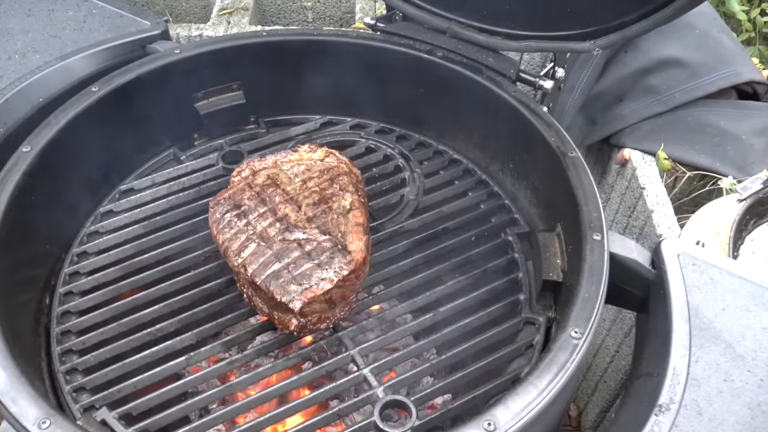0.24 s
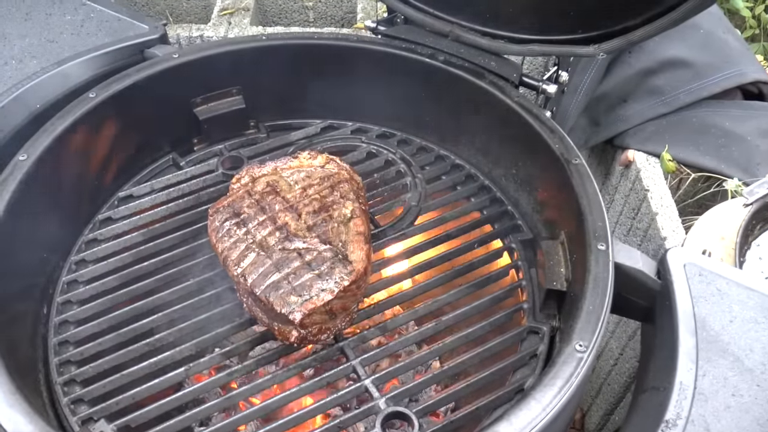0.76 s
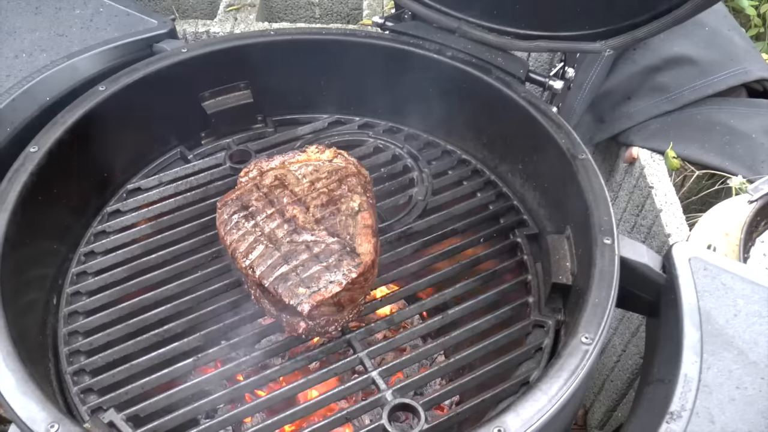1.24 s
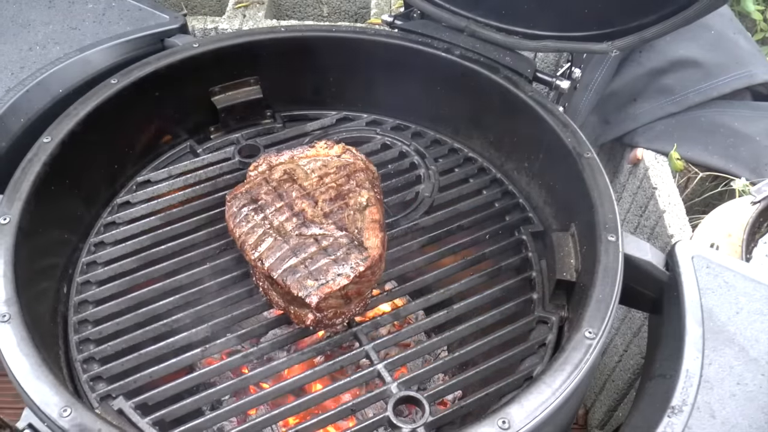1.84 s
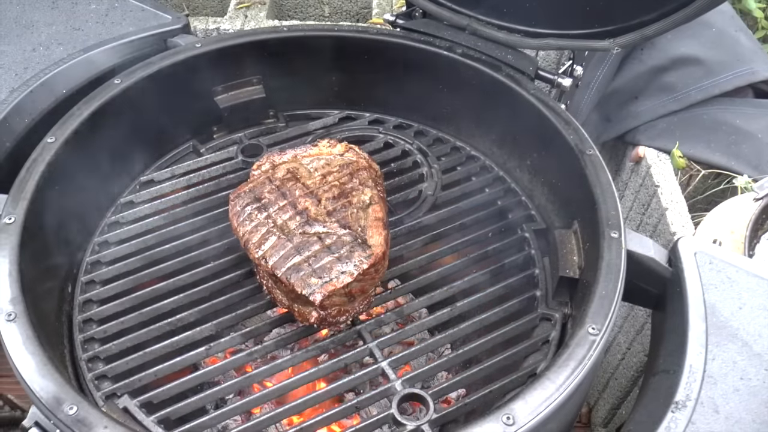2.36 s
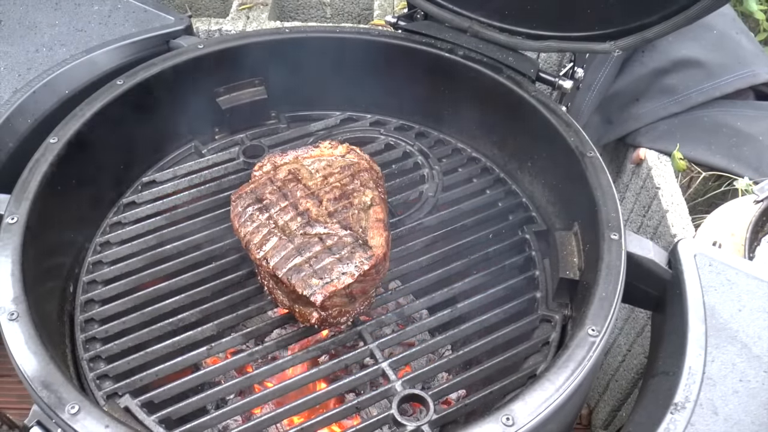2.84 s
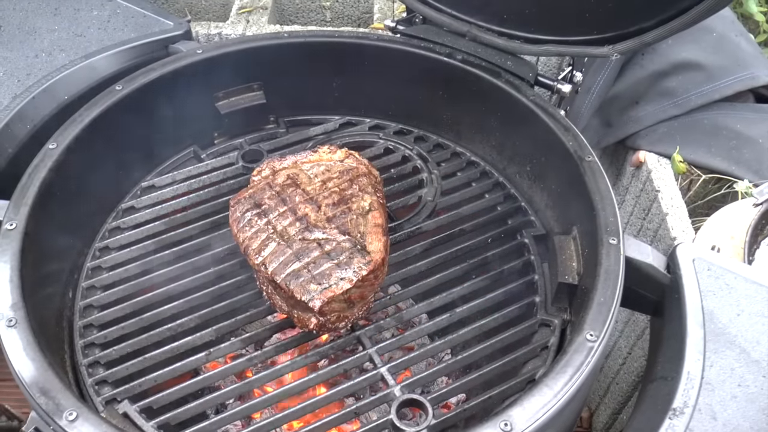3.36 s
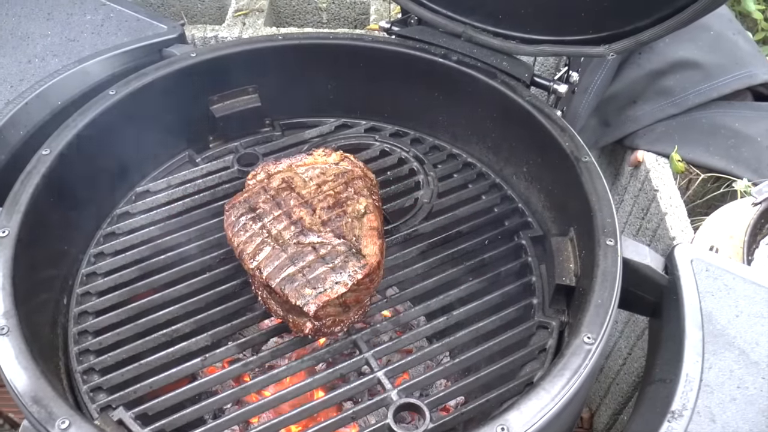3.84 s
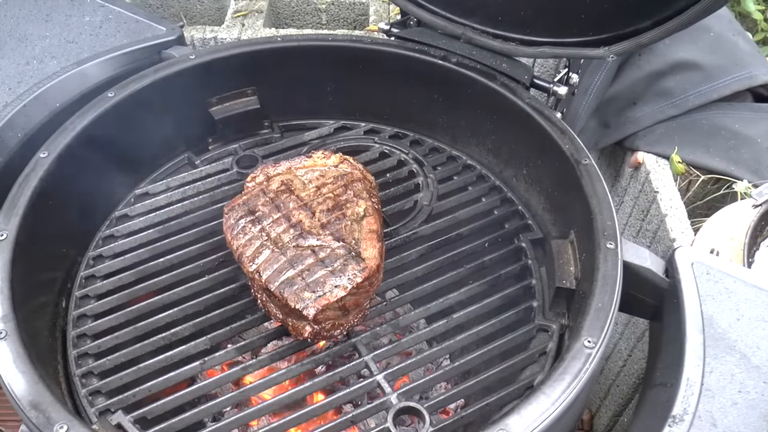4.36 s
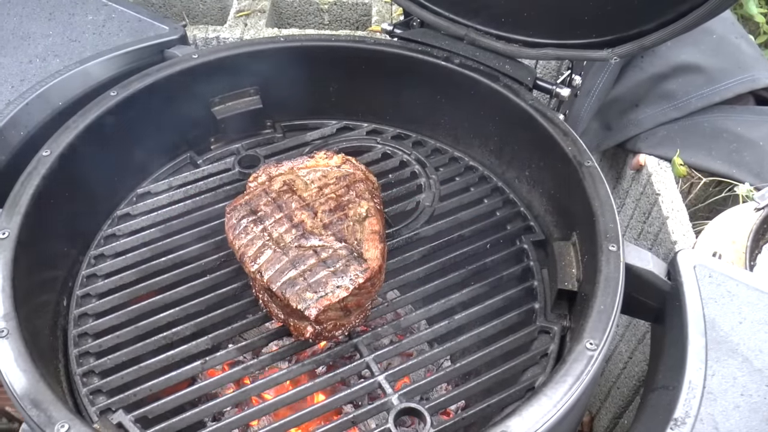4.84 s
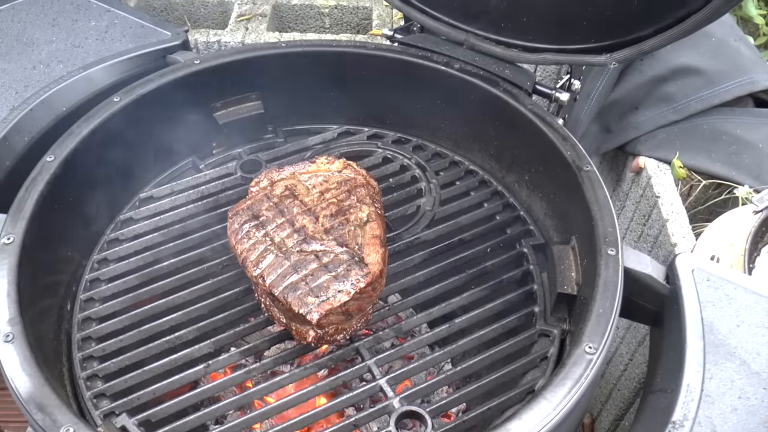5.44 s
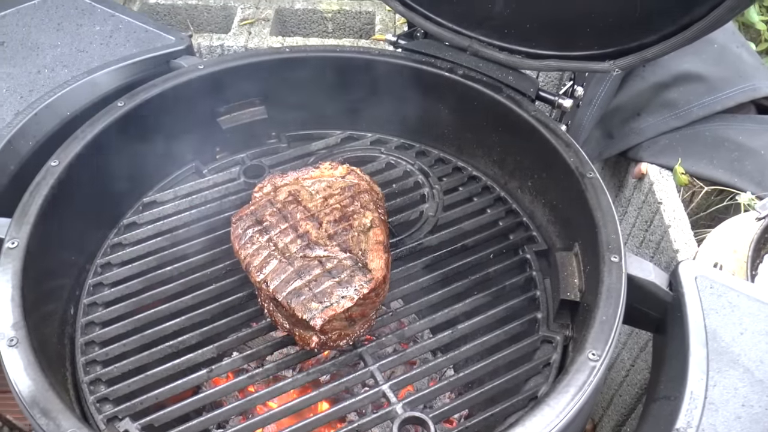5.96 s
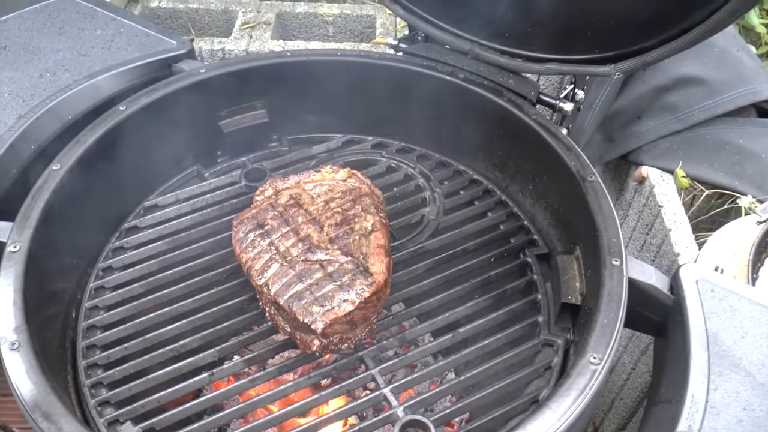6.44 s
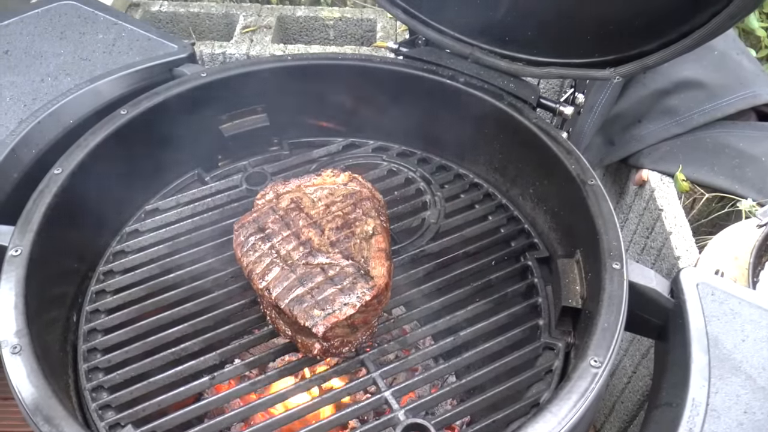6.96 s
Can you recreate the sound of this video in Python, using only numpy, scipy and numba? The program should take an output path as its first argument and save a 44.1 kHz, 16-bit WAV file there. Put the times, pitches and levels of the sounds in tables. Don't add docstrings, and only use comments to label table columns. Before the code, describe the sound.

A roast sizzles on the iron grate of a round charcoal grill outdoors, captured close in mono. The bright, grainy hiss runs throughout the roughly 7 seconds, gently surging and thinning, with drifting hollow metallic resonances from the bowl. Beneath it are quiet fire flutter and faint breeze rumble. Small pops and dull knocks come in the first half second; at about 0.75 s a loud, sharp cluster of fat cracks bursts with a soft low flare, followed by lesser pops near 1.0 and 1.3 s. Around 1.55 s another low puff of flame sounds, then from 1.7 to 2.5 s a wind gust buffets the microphone with heavy, uneven, slightly saturated low thuds. It clears and the sizzle continues, with snaps near 3.8 and 4.35 s, bright spits around 4.9, 5.2, 5.4 and 6.0 s, a crack at 6.9 s and a last spit near 7.1 s.

```python
import sys
import numpy as np
from scipy import signal
from scipy.fft import rfft, irfft, next_fast_len
from scipy.io import wavfile
from scipy.ndimage import uniform_filter1d
from numba import njit

SR = 44100
rng = np.random.default_rng(int(sys.argv[2]) if len(sys.argv) > 2 else 0)


def persist_wave(psi):
    counts = np.round(np.clip(psi, -1, 1) * 32767).astype(np.int16)
    wavfile.write(sys.argv[1], SR, np.atleast_2d(counts).T)


def ratio_of_db(decibels):
    return 10 ** (np.asarray(decibels, float) / 20)


N = 317079


def rms_one(x):
    return x / np.sqrt(np.mean(x ** 2) + 1e-20)


def in_time(rows):
    s, *columns = np.transpose(rows)
    return [np.interp(np.arange(N) / SR, s, c) for c in columns]


def swell(s, half_s):
    return np.exp(-((np.arange(N) / SR - s) / half_s) ** 2)


def band(x, low_hz, high_hz):
    return signal.sosfilt(signal.butter(2, [low_hz, min(high_hz, .45 * SR)], "band", fs=SR, output="sos"), x)


def drift(rate):
    r = np.exp(-100 * np.pi * rate / SR)
    noise = rng.standard_normal(N // 50 + 2002)
    slow = signal.lfilter([1], [1, -2 * r, r * r], noise)[2000:]
    slow = slow - uniform_filter1d(slow, int(SR / 50 / rate * 1.5))
    return np.interp(np.arange(N) / 50, np.arange(len(slow)), rms_one(slow))


def lumps(spectrum, hold):
    hz, db = np.transpose(spectrum)
    size = next_fast_len(N)
    bins = np.arange(1, size // 2 + 2) * SR / size
    colour = ratio_of_db(np.interp(np.log(bins), np.log(hz), db, left=-90, right=-90))
    noise = rms_one(irfft(rfft(rng.standard_normal(size)) * colour, size)[:N])
    return rms_one(noise / (uniform_filter1d(noise ** 2, size=2600) + 0.058) ** hold)


def port_flutter():
    # frequency in Hz, level in dB per Hz.
    flutter_spectrum = [(35, -33), (50, -5.5), (70, 7.5), (110, -3), (170, -11.5), (250, -25.5), (350, -36),
                        (600, -41)]
    return lumps(flutter_spectrum, hold=0.63)


def breeze(flutter):
    # time in seconds, rumble level in dB.
    strength = [(0, -36.5), (.2, -46), (.42, -36.5), (.95, -38.5), (1.24, -31.5), (1.5, -41), (1.7, -35),
                (2.62, -34.5), (2.8, -32), (3.08, -34.5), (3.5, -39), (3.83, -30.5), (4.1, -39),
                (4.85, -35.5), (5.1, -39), (5.68, -36.5), (6.28, -38), (7.19, -38.5)]
    # frequency in Hz, level in dB per Hz.
    rumble_spectrum = [(5.9, -23), (10, 9), (24, -4), (38, -6.5), (74, -14.5), (110, -22.5), (140, -38),
                       (240, -120)]
    # centre in seconds, flutter level in dB, half length in seconds.
    light_puffs = [
        (0.245, -46, .05),
        (2.854, -47.5, 0.05),
        (3.06, -44, 0.049),
        (3.796, -55, 0.1),
        (4.02, -43, 0.053),
        (5.318, -45.5, 0.049),
        (6.24, -39, 0.072),
    ]
    level_db, = in_time(strength)
    rumble = ratio_of_db(level_db + 1.5 * drift(4.1)) * lumps(rumble_spectrum, hold=0.29)
    return rumble + flutter * sum(ratio_of_db(db) * swell(s, half) for s, db, half in light_puffs)


def whip(speed_db):
    # frequency in Hz, level in dB per Hz.
    whip_spectrum = [(90, -14), (150, 14), (230, 3), (350, -9), (700, -26)]
    level_db = -39.5 + 1.9 * (speed_db + 25)
    return ratio_of_db(level_db + 3.0 * drift(18.0)) * lumps(whip_spectrum, hold=0.05)


def gust(flutter):
    # time in seconds, speed of the gust heard as flutter in dB.
    speed = [
        (1.6, -45),
        (1.71, -31.5),
        (1.75, -32),
        (1.93, -31.5),
        (2.2, -26.5),
        (2.36, -30),
        (2.46, -36.5),
        (2.6, -57),
    ]
    # frequency in Hz, level in dB per Hz.
    buffet_spectrum = [(8, -20), (14, 5), (28, -2), (45, -2.5), (70, -4), (100, -38), (200, -55)]
    # centre in seconds, peak in dB, half length in seconds, swing in Hz.
    strong_eddies = [(1.724, -26, 0.015, 30), (1.758, -12.5, 0.017, 33), (1.788, -10, 0.026, 29.1),
                     (1.862, -5.5, 0.012, 47.7), (1.895, -13, 0.024, 33), (1.933, -25, 0.017, 35),
                     (1.985, -12.5, 0.031, 34), (2.046, -12.5, 0.011, 50), (2.084, -19, 0.017, 45),
                     (2.143, -18, 0.029, 40.6), (2.196, -24, 0.014, 45), (2.239, -23, .01, 50),
                     (2.253, -21, 0.008, 55), (2.295, -16, 0.011, 50), (2.323, -20, .01, 50),
                     (2.354, -12.5, 0.017, 28.4), (2.396, -25, 0.047, 25.9)]
    speed_db, = in_time([(1.55, -90), *speed, (2.65, -90)])
    t = np.arange(N) / SR
    eddies = sum(ratio_of_db(db) * swell(s, half) * np.cos(2 * np.pi * hz * (t - s)) for s, db, half, hz in strong_eddies)
    turbulence = ratio_of_db(0.5) * lumps(buffet_spectrum, hold=0.53) + flutter
    limit = .7
    pressed = limit * np.tanh((eddies + ratio_of_db(speed_db) * turbulence) / limit)
    return pressed + whip(speed_db)


def fire():
    # time in seconds, level in dB.
    flames = [
        (0, -47.5),
        (.5, -48.5),
        (.8, -41.5),
        (1.3, -47),
        (1.6, -46),
        (2.4, -48),
        (2.8, -50),
        (4.4, -48),
        (7.19, -50.5),
    ]
    # frequency in Hz, level in dB per Hz.
    roar_spectrum = [(45, -21), (70, -5.5), (110, -7), (165, -0.5), (230, -8), (330, -23.5), (600, -24),
                     (1800, -28.5)]
    level_db, = in_time(flames)
    return ratio_of_db(level_db + 1.8 * drift(15.3)) * lumps(roar_spectrum, hold=0.13)


def flares():
    # start in seconds, peak in dB, frequency in Hz.
    ignitions = [(0.076, -31, 147), (0.263, -30.5, 145), (0.71, -24.5, 160), (0.734, -23.5, 132),
                 (0.753, -21, 178), (1.268, -40, 216), (1.541, -20.5, 172), (1.604, -20.5, 164),
                 (2.599, -35, 184), (2.736, -33.5, 121), (2.992, -41, 161), (3.309, -26, 153),
                 (3.975, -29, 157), (4.486, -27.5, 188), (5.852, -50, 165)]
    out, t = np.zeros(N), np.arange(3000) / SR
    for s, db, hz in ignitions:
        swing = -np.sin(2 * np.pi * hz * (t - .004)) * (t / 0.0051) ** 2 * np.exp(-t / 0.0026)
        swing += 0.083 * np.sin(5.2 * np.pi * hz * t) * (t / 0.011) * np.exp(-t / 0.0035)
        at = round(s * SR)
        out[at:at + 3000] += ratio_of_db(db + 16.5) * swing
    return out


def bubbles_and_knocks():
    # start in seconds, peak in dB, frequency in Hz, rise in octaves, length in seconds.
    pockets = [(0.743, -16, 1800, .2, .001), (0.7444, -15, 2380, 0.74, .0021),
               (.7466, -15, 3380, .05, 0.0025), (.7458, -19, 4500, .1, 0.0011),
               (0.747, -24, 6560, .1, .002), (0.9607, -25, 2200, .7, .003),
               (.9795, -34, 2400, 0.44, 0.0027), (1.3195, -29, 3200, .1, 0.0018),
               (3.7761, -19.5, 2500, 0.46, .0014), (4.358, -24, 2300, 0.75, .002),
               (6.9215, -26, 2900, .1, .003), (.6605, -28, 3300, .2, .003)]
    # start in seconds, peak in dB, frequency in Hz.
    drips = [
        (1.272, -37, 450),
        (1.398, -38, 500),
        (1.415, -39, 600),
        (1.545, -36, 446),
        (1.607, -38, 780),
        (1.65, -38, 500),
        (.4125, -36, 900),
        (.311, -37, 1000),
        (.072, -33, 900),
    ]
    knocks = [(s, db, hz, 0, 2.0 / hz) for s, db, hz in drips]
    out = np.zeros(N)
    for s, db, hz, rise, length in [*pockets, *knocks]:
        t = np.arange(int(length * SR))
        pitch = hz * 2 ** (rise * t / len(t))
        envelope = np.sin(np.pi * (t / len(t)) ** 0.65)
        out[round(s * SR) + t] += ratio_of_db(db) * envelope * np.sin(2 * np.pi * np.cumsum(pitch) / SR)
    return out


def cracks():
    # time in seconds, peak in dB.
    snaps = [(.0718, -27), (.3715, -26), (0.7433, -10), (0.7455, -12), (.7506, -20), (.9587, -19),
             (.9601, -23), (.9611, -24), (1.3156, -19), (1.3164, -25), (2.3465, -23), (3.7761, -13),
             (3.8745, -22), (3.8788, -26), (.3822, -20), (.4128, -26), (4.3457, -24), (4.3492, -21),
             (4.3512, -13), (4.3549, -24), (4.359, -17), (6.6345, -18), (6.9066, -12.5), (1.524, -35),
             (4.917, -28), (5.449, -30), (7.002, -26)]
    s, db = np.transpose(snaps)
    clicks = np.zeros(N)
    clicks[np.round(s * SR).astype(int)] = -ratio_of_db(db)
    return ratio_of_db(10.0) * band(clicks, 660, 5400) + ratio_of_db(4.0) * band(clicks, 5200, 12000)


def ticks():
    # time in seconds, peak in dB.
    droplets = [(0.3711, -20), (0.7441, -5), (0.9577, -32), (1.1343, -31), (1.3927, -19), (1.4386, -21),
                (1.5833, -15), (1.7983, -21), (1.8981, -17), (2.14, -20), (2.4818, -21), (2.8549, -27),
                (3.1258, -25), (3.241, -28), (3.4895, -34), (3.6391, -21), (3.7748, -23), (3.7973, -24),
                (3.842, -14), (4.2433, -24), (4.3051, -27), (4.348, -20), (4.7376, -23), (4.9038, -24),
                (4.9317, -22), (5.1961, -25), (5.3607, -23), (5.4186, -20), (5.7493, -21), (5.8257, -22),
                (5.9933, -32), (6.3594, -24), (6.7431, -22), (6.8339, -47), (7.0753, -56), (7.0753, -27)]
    s, db = np.transpose(droplets)
    clicks, at = np.zeros(N + 100), (s * SR).astype(int) + 4
    clicks[at] = ratio_of_db(db) * rng.choice([-1, 1], len(s))
    clicks[at + rng.integers(12, 90, len(s))] += ratio_of_db(db - 11.0)
    return ratio_of_db(7.0) * band(clicks[:N], 9600, 19000)


def crackles(rows, extra_db, snap, fall_db):
    out, t = np.zeros(N + 2000), np.arange(2000) / SR
    draws = rng.standard_normal((len(rows), 2000)) ** 3 / 4
    draws[:, 0] = snap
    for row, db, draw in zip(rows, extra_db, draws):
        at, length = round(row[0] * SR), row[-1]
        burst = draw * ratio_of_db(-fall_db * t / max(length, .001))
        energy = np.sum(burst ** 2) / (1 + 4000 * length)
        out[at:at + 2000] += ratio_of_db(row[1] + db) * burst / np.sqrt(energy)
    return out[:N]


def spits():
    # start in seconds, peak in dB, frequency in Hz.
    droplets = [(.376, -15.5, 8500), (0.7463, -13, 8300), (1.696, -11.5, 6800), (1.7884, -11, 7600),
                (1.902, -13, 7370), (2.14, -12, 7540), (2.162, -17, 8100), (2.481, -18, 8750),
                (2.6584, -27, 7630), (2.86, -35, 7970), (2.9761, -22, 8270), (3.3355, -15, 7600),
                (3.4895, -17, 8700), (3.6391, -16, 10600), (3.841, -18, 6900), (3.92, -18, 7200),
                (4.3525, -15, 8000), (4.7381, -22, 7510), (4.9038, -12.5, 9900), (5.199, -12, 8140),
                (5.3607, -19, 10720), (5.4186, -10.5, 8380), (5.8257, -27, 6500), (6.033, -9.5, 7200),
                (6.363, -11.5, 7840), (6.685, -16, 7850), (7.0747, -8.5, 8040), (7.1367, -11, 6730)]
    out, length_s = np.zeros(N), 0.012
    rows = [(s, db, length_s) for s, db, hz in droplets]
    clicks = crackles(rows, np.zeros(len(rows)), snap=1.3, fall_db=21)
    for s, db, hz in droplets:
        span = slice(round(s * SR), round(s * SR) + 1500)
        out[span] += band(clicks[span], 0.86 * hz, 1.23 * hz)
    return ratio_of_db(-3.0) * out


def pops():
    # start in seconds, peak in dB, brightness in dB, depth in dB.
    single_pops = [(0.07, -25, -15, -3), (.167, -31, 3, -26), (.382, -20, -14, -16),
                   (0.411, -23.5, -9, -8.5), (0.662, -21.5, -18, -15), (4.772, -33, -9, -23),
                   (0.978, -25, -4, -8), (1.14, -26.5, -12, -13), (1.316, -26, -5, -28),
                   (1.399, -38, 21, -1), (1.605, -24.5, -11, -2), (1.637, -31, -4, -4),
                   (2.35, -25, -17, -28), (2.431, -27, 9, -26), (3.017, -30, -13, -28),
                   (3.126, -34, 12, -35), (3.534, -22.5, -11, -16), (3.64, -26, 8, -4.5),
                   (3.777, -27, -4, -7), (3.875, -27, -2, -9), (4.152, -27, -23, -35),
                   (4.338, -26, -6, -28), (4.83, -47, -27, -16), (6.635, -26, 6, -8), (6.746, -25, 11, -13),
                   (6.907, -28, 5, -8)]
    # start in seconds, peak in dB, brightness in dB, depth in dB, length in seconds.
    big_pops = [
        (0.7430, -19.5, -16, 4.5, 0.0029),
        (.7441, -17, 15, -8, 0.001),
        (0.7448, -16, -2, -15, 0.0051),
        (0.7475, -13.5, -4, -16, 0.005),
        (0.956, -26, 2, -7, 0.0082),
        (4.3492, -26, 10, -11, 0.003),
        (4.3514, -22, 3, -18, 0.0044),
        (4.359, -23, -1, -13, 0.0073),
    ]
    rows = np.array([(*pop, 0.0073 + .0001 * (pop[1] + 22)) for pop in single_pops] + [*big_pops])
    clicks = crackles(rows, 0 * rows[:, 2], snap=2.0, fall_db=16.0)
    body = band(clicks, 1220, 5100)
    body = body + ratio_of_db(-15.0) * band(clicks, 2550, 2840) + ratio_of_db(-8.0) * band(clicks, 2950, 3600)
    edge = band(crackles(rows, rows[:, 2], snap=11.0, fall_db=45), 5000, 19000)
    depth = band(crackles(rows, rows[:, 3], snap=0.83, fall_db=4.0), 146, 680)
    return ratio_of_db(5.0) * body, ratio_of_db(-7) * edge + ratio_of_db(13.0) * depth


@njit
def moving_resonance(x, cosine, r):
    y = np.zeros(len(x))
    for i in range(2, len(x)):
        y[i] = (1 - r * r) / 2 * (x[i] - x[i - 2]) + 2 * r * cosine[i] * y[i - 1] - r * r * y[i - 2]
    return y


def bowl(x, fade_db):
    # frequency in Hz, width in Hz, level in dB.
    modes = [(442, 90, -8), (687, 89, -16.5), (1015, 240, -17), (1425, 108, -0.5), (1970, 308, -5),
             (2530, 113, 1.15), (3015, 186, 3), (3547, 108, -2), (3970, 164, -5.5), (4515, 110, -6),
             (3300, 81, -1), (5230, 126, -2.5)]
    # time in seconds, shift by hot air in %, gain into the bowl in dB, lean to upper modes in dB.
    heat = [(0, 1.3, 2, -1), (.3, -1.2, 0.8, 0), (.58, -0.5, 2, 0), (.8, -2, 2, 1.5), (1.2, -1, 2, -1),
            (1.5, 0.5, 0.6, 0), (1.85, 0, 0, 1.5), (2.45, 0, 0, -0.5), (2.8, -2, 0.5, 1.5),
            (3.3, 0.5, 1, 1), (3.9, .9, 0.7, -0.5), (4.4, 1.8, 0, 0), (5.05, 2.5, 0, 0.5),
            (5.45, 1.4, 3.5, -0.5), (5.66, 1, -3, -2.5), (5.95, 0, 1, 0.5), (6.55, -0.5, -1.2, -1),
            (7.19, 1.3, 0.1, 0)]
    # centre in seconds, half length in seconds, mode in Hz, favour in dB, shift in %.
    spots = [(1.1, 0.18, 1426, -5.5, 2), (1.452, 0.29, 1426, 2.5, -3), (2.5, 0.44, 1426, -1.5, -1),
             (.22, .1, 1426, -3.5, -0.5), (4.7, .1, 1426, -3.5, -1), (5.3, 0.084, 1426, 3, -1),
             (.2, 0.36, 2533, -2, 1.5), (1.1, 0.37, 2533, -6, -0.3), (1.9, 0.48, 2533, 0.5, 0.5),
             (2.498, 0.091, 2533, -6, 0), (2.898, 0.13, 2533, 4, -0.8), (0.6, .08, 2533, -4, 0.3),
             (5.88, 0.13, 2533, 4.5, 0), (5.4, .04, 2533, -3, -1), (6.9, .3, 2533, 0.5, 0.5),
             (.18, .13, 3013, 1, 0.5), (0.93, 0.081, 3013, -5.5, -5), (1.13, 0.15, 3013, 3, -0.5),
             (3.098, 0.089, 3013, -0.5, -3), (3.5, 0.2, 3013, 2, 1), (4.2, 0.21, 3013, 3.5, 0),
             (4.8, 0.091, 3013, 4.5, -1), (3.82, .03, 2533, 3, 0), (6.2, 0.78, 3013, -0.5, -2),
             (6.996, 0.21, 3013, 1.5, -0.5), (.2, 0.27, 3546, -5, 2), (0.76, 0.14, 3546, 6.5, 1),
             (1.43, 0.13, 3546, 6, 0), (2.5, 0.23, 3546, 5.5, 1), (3.4, 0.4, 3546, -4.5, 0.5),
             (4.4, 0.2, 3546, 0, 4), (4.8, 0.17, 3546, 7.5, 1), (5.1, .1, 3546, -4, 2),
             (6.0, .3, 3546, 3.5, 0.5), (4.9, 0.27, 3970, -9, -1.5), (7.05, .15, 3970, 6, 1.5),
             (.9, .4, 4518, 0, -0.5), (2.1, .2, 4518, -14, -9), (2.8, 0.33, 4518, 5, 2),
             (6, 0.4, 4518, 6, 3)]
    shift, gain_db, lean_db = in_time(heat)
    stays = np.array([swell(s, half) for s, half, *rest in spots])
    spot_hz, spot_db, spot_shift = np.transpose(spots)[2:]
    out = 0
    for k, (hz, width, db) in enumerate(modes):
        near = np.exp(-(np.log(spot_hz / hz) / .045) ** 2)
        favour_db, pull = np.array([near * spot_db, near * spot_shift]) @ stays
        cosine = np.cos(2 * np.pi * hz * (1 + (shift + pull) / 100) / SR)
        r = np.exp(-1.55 * np.pi * width / SR)
        twice = moving_resonance(moving_resonance(x, cosine, r), cosine, r)
        lean = np.clip(np.log2(hz / 2300), -1, 1)
        level_db = db + gain_db + favour_db + lean * lean_db + fade_db * drift(4.8)
        out = out + (-1) ** k * ratio_of_db(level_db) * twice
    return out


def vigour():
    # time in seconds, vigour in dB.
    sear = [(0, -34.5), (.3, -36.5), (.7, -35.5), (1.15, -40.5), (1.6, -35), (2.1, -35), (2.35, -36.5),
            (2.7, -35), (3.2, -34.5), (3.9, -37), (4.4, -35), (4.9, -33.5), (5.4, -36), (5.7, -37),
            (6.1, -34.5), (6.45, -35.5), (6.8, -33.5), (7.19, -35.5)]
    # centre in seconds, swell in dB, half length in seconds, extra brightness in dB.
    surges = [(0.377, 2, 0.075, 0.5), (0.552, -4, 0.092, 0.5), (0.881, -4, 0.053, -1),
              (1.006, 3, .04, -1.5), (1.166, 1.5, .04, -0.5), (1.277, 3.5, 0.053, 1),
              (1.647, 0, 0.053, 2.5), (1.794, 2.5, 0.021, -2), (1.927, 2, 0.061, 0.5),
              (2.16, 0, 0.031, 1.5), (2.325, -2, 0.042, 1.5), (2.484, 2, .03, 2.5), (2.63, 2, 0.059, 0.5),
              (3.154, 2.5, 0.046, 0), (3.645, 1, 0.041, -0.5), (3.75, -1.5, 0.063, 0.5),
              (3.948, 3, 0.021, 1.5), (4.07, -0.5, 0.046, -3), (4.209, 2, 0.048, -0.5),
              (4.377, 2.5, 0.059, -1.5), (4.72, -1.5, 0.028, 1), (4.926, -2.5, 0.076, 4.5),
              (5.156, -2, 0.088, 1), (5.256, 0, 0.053, 4), (5.398, -3, 0.053, 6.5), (5.612, -1, .07, 0),
              (5.812, 3.5, 0.1, -1.5), (5.97, 0, 0.078, -3.5), (6.457, 4, 0.14, 0), (7.09, 4, 0.036, -6),
              (5.018, -0.5, 0.042, 1.5), (6.6, -0.2, .08, -2.5), (4.82, 0.5, 0.017, -1),
              (6.782, 1.5, 0.055, -7.5), (4.303, -2.5, .03, 4), (5.097, -0.5, .025, 2.5),
              (1.452, -1, .06, 2), (2.9, 0, 0.079, 1.5), (3.4, -0.5, .07, 1), (6.2, 1.3, 0.046, -0.5),
              (6.925, 2.7, 0.033, -4.5)]
    level_db, = in_time(sear)
    level_db = level_db + sum(db * swell(s, half) for s, db, half, bright in surges)
    bright_db = sum(bright * swell(s, half) for s, db, half, bright in surges)
    return level_db, bright_db + 0.11 * (level_db - level_db.mean())


def grains(level_db):
    per_s, grain_db = 500, -14
    sizes = ratio_of_db(5.3 * np.minimum(rng.exponential(1, N), 4)) * rng.choice([-1, 1], N)
    clicks = rms_one(sizes * (rng.random(N) < per_s / SR))
    dealt = rng.integers(0, 3, N)
    bright = sum(band(clicks * (dealt == k), hz, 2.1 * hz) for k, hz in enumerate([4500, 6500, 9000]))
    return ratio_of_db(level_db + grain_db) * rms_one(bright)


def steam_bursts(per_s, spread_db, clump_db):
    clumps = ratio_of_db(clump_db * (0.072 * drift(11.0) + 0.4 * drift(21.0) + .5 * drift(53)))
    sizes = ratio_of_db(spread_db * np.minimum(rng.exponential(1, (2, N)), 6)) * rng.choice([-1, 1], (2, N))
    return rms_one(clumps * sizes * (rng.random((2, N)) < per_s / SR))


def echoes(streams, lags_ms, wander, echo_db):
    out, n = np.array(streams), np.arange(N)
    dull = signal.lfilter(*signal.butter(1, 8000, fs=SR), streams)
    for k, lag_ms in enumerate(lags_ms):
        lag = lag_ms * SR / 1000 * (1 + wander * drift(1.12))
        out[k % 2] += ratio_of_db(echo_db + 3.9 * drift(2.5)) * np.interp(n - lag, n, dull[k % 2])
    return out


def coloured(x, spectrum, patchy_db, patch_rate, count=3):
    hz, db = np.transpose(spectrum)
    edges = hz[0] * 2 ** np.arange(0, np.log2(hz[-1] / hz[0]) + 1 / count, 1 / count)
    out = 0
    for k, (low, high) in enumerate(zip(edges, edges[1:])):
        level = np.interp(np.log(low * high) / 2, np.log(hz), db)
        out = out + ratio_of_db(level + patchy_db * drift(patch_rate)) * band(x[k % 2], low, high)
    return rms_one(out)


def open_sizzle(bursts, level_db, tilt_db):
    # frequency in Hz, level in dB per Hz.
    sizzle_spectrum = [(2760, -24), (4700, -4), (5550, -3), (8460, 1.5), (11300, -2.5), (15600, -8.5)]
    heard = echoes(bursts, lags_ms=[.9, 1.3, 1.9, 2.7], wander=0.059, echo_db=-8.0)
    sizzle = coloured(heard, sizzle_spectrum, patchy_db=1.13, patch_rate=10.3, count=5)
    low = signal.lfilter(*signal.butter(2, 10500, fs=SR), sizzle)
    tilted = low + (sizzle - low) * ratio_of_db(tilt_db - 0.35)
    return ratio_of_db(level_db + 0.84) * tilted


def scene():
    flutter = port_flutter()
    air_and_fire = breeze(flutter) + gust(flutter) + fire() + flares()
    body, edge_and_depth = pops()
    fat = ratio_of_db(-1.0) * body + edge_and_depth + spits() + ticks() + bubbles_and_knocks() + cracks()

    level_db, tilt_db = vigour()
    bursts = steam_bursts(per_s=14000, spread_db=2.5, clump_db=1.68)
    bowl_db = -39 + 0.62 * (level_db - level_db.mean())
    in_bowl = ratio_of_db(bowl_db + 11) * bursts[0] + ratio_of_db(-23.0) * body
    sizzle = open_sizzle(bursts, level_db, tilt_db) + bowl(in_bowl, fade_db=0.9) + grains(level_db)
    return np.tile(air_and_fire + fat + sizzle, (2, 1))


def top_cut(x):
    return signal.sosfilt(signal.butter(12, 16970, fs=SR, output="sos"), x)


def record(dry):
    cutoff_hz = 15900
    low_pass = signal.ellip(12, .5, 70, cutoff_hz - 180, fs=SR, output="sos")
    mix = signal.sosfilt(low_pass, dry)
    return top_cut(mix)


dry = scene()
out = record(dry)
persist_wave(out)
```